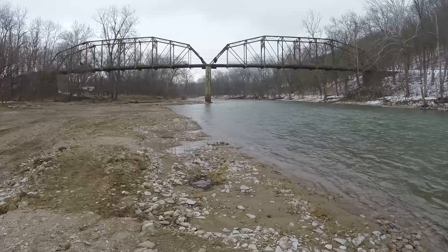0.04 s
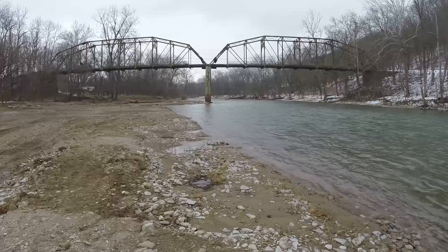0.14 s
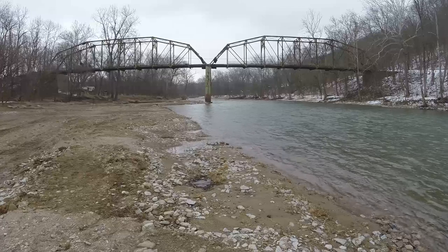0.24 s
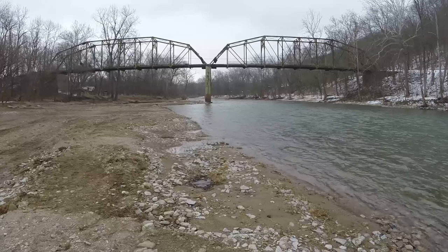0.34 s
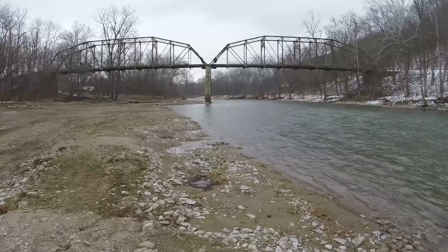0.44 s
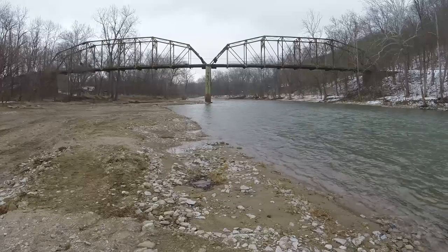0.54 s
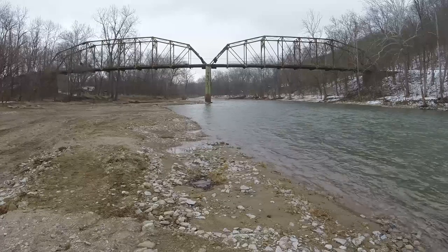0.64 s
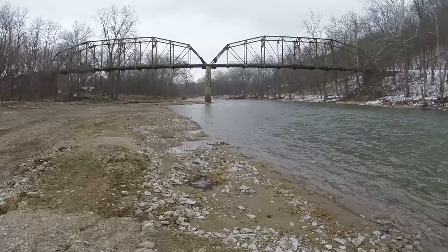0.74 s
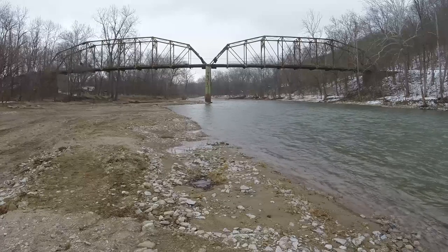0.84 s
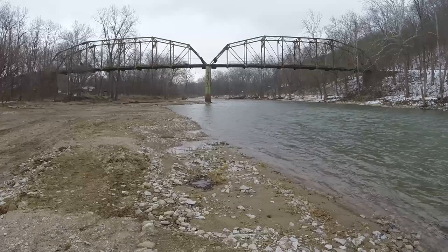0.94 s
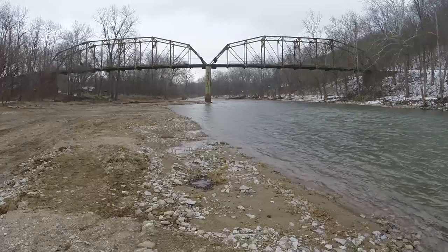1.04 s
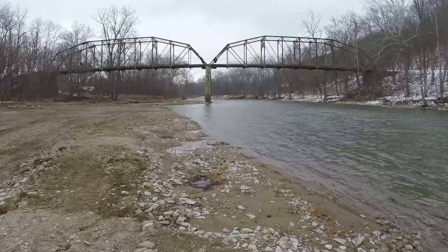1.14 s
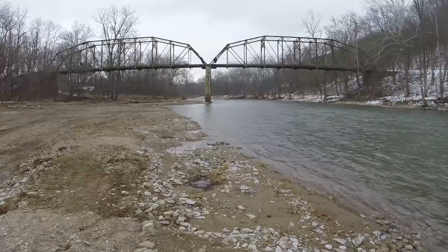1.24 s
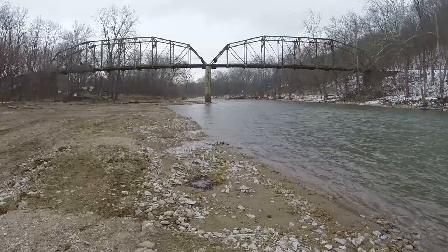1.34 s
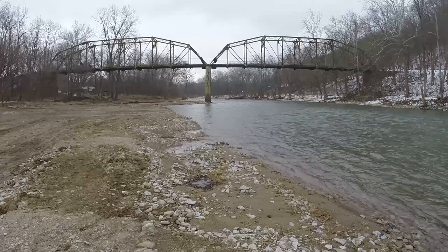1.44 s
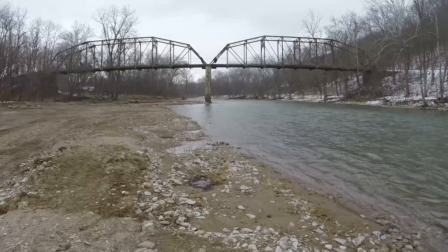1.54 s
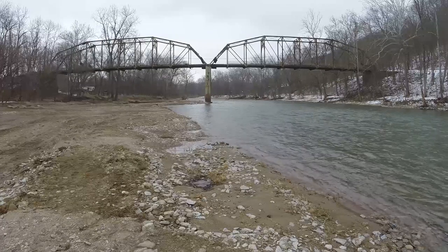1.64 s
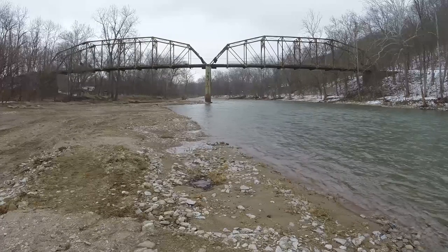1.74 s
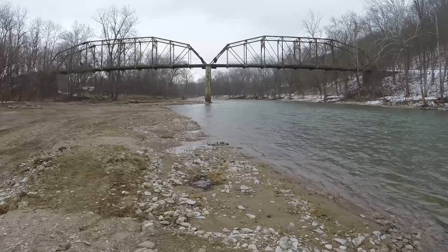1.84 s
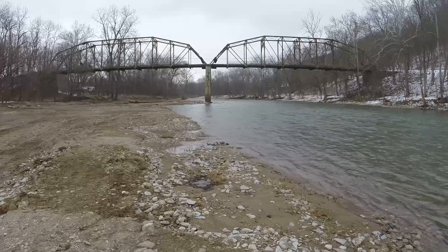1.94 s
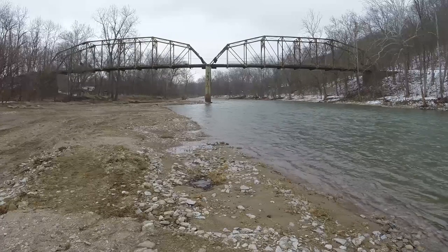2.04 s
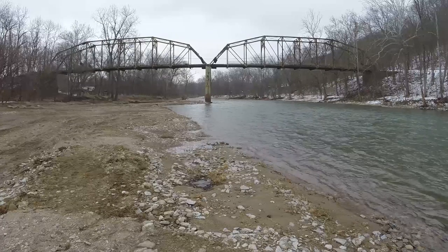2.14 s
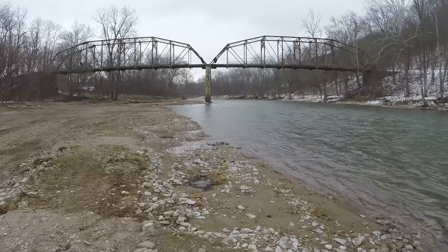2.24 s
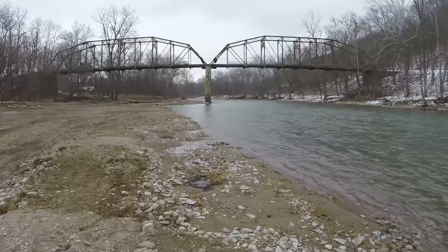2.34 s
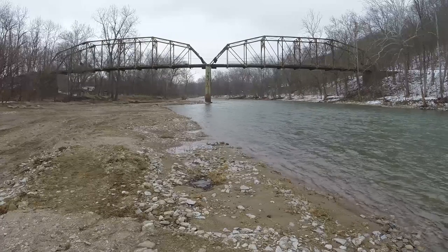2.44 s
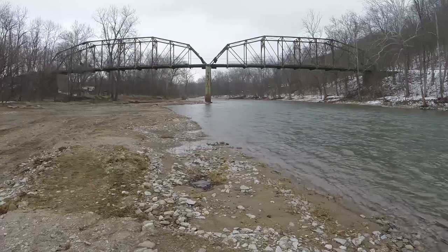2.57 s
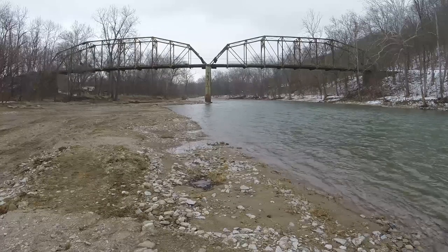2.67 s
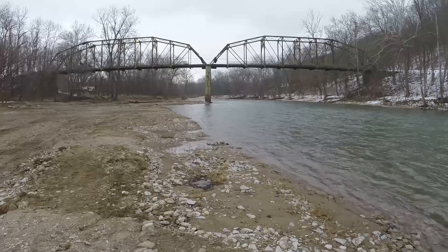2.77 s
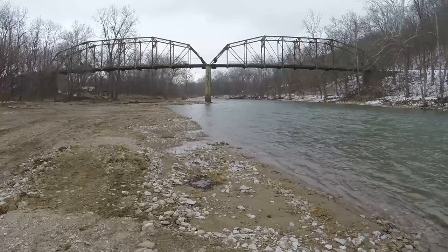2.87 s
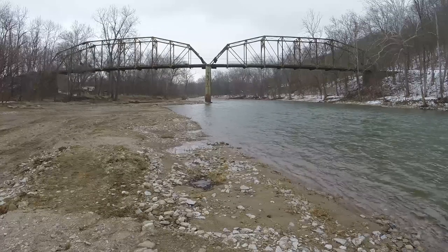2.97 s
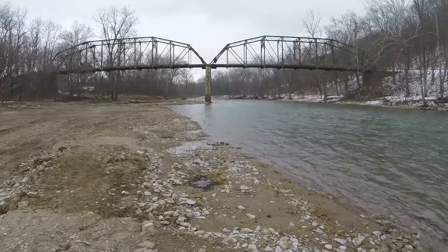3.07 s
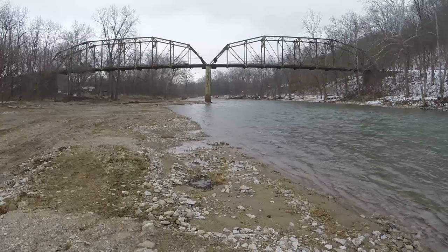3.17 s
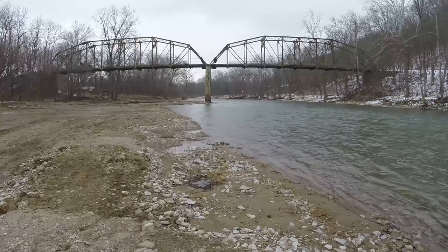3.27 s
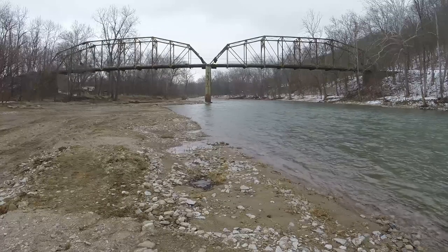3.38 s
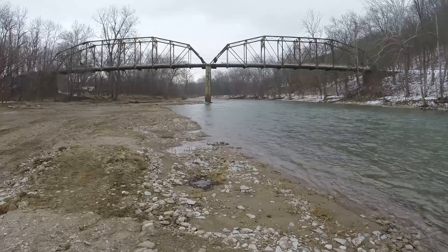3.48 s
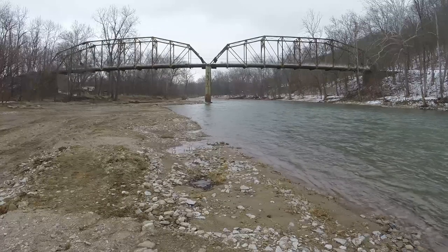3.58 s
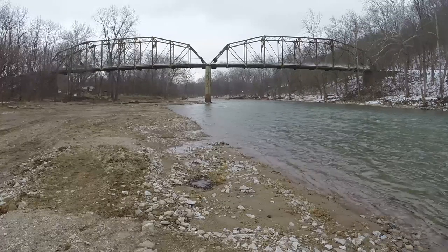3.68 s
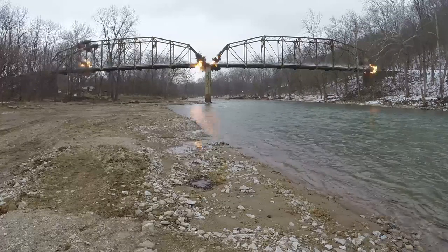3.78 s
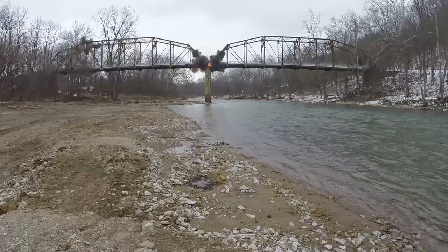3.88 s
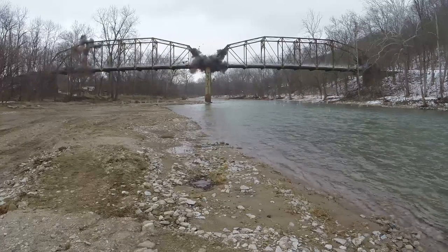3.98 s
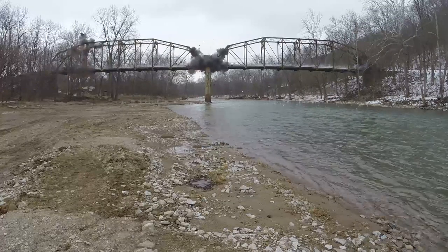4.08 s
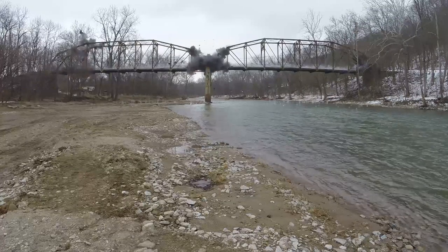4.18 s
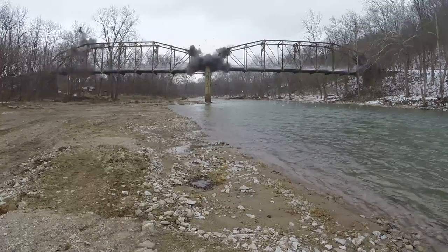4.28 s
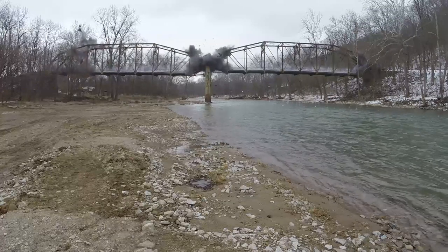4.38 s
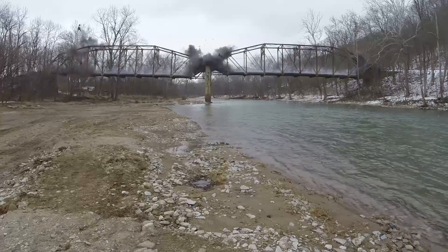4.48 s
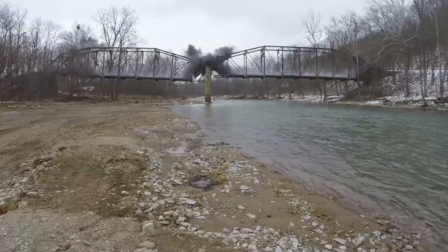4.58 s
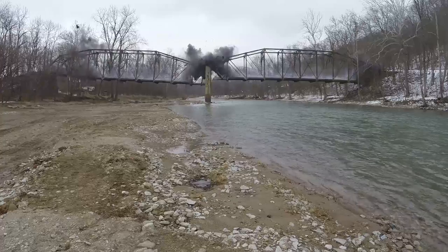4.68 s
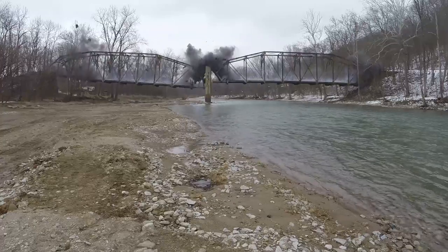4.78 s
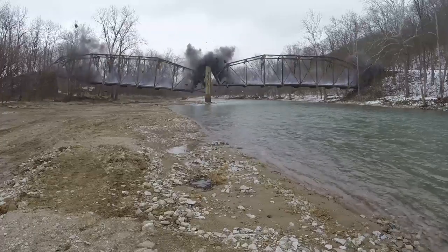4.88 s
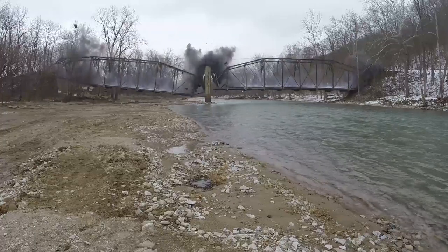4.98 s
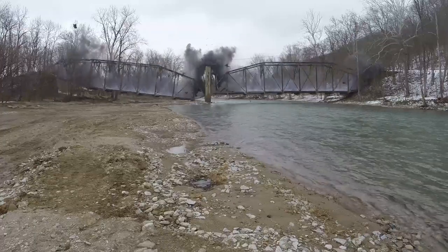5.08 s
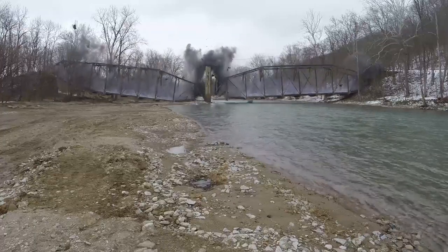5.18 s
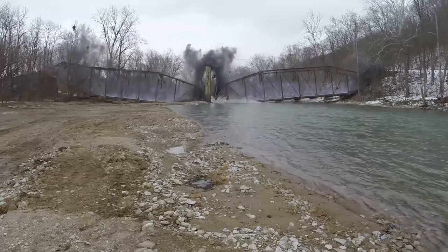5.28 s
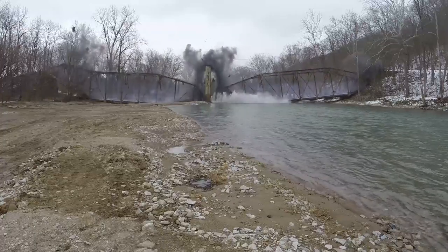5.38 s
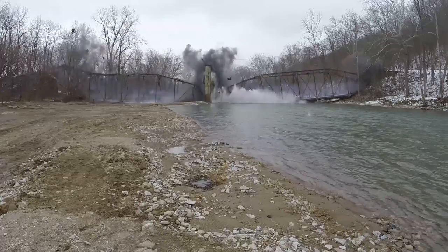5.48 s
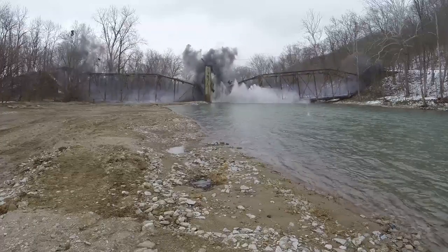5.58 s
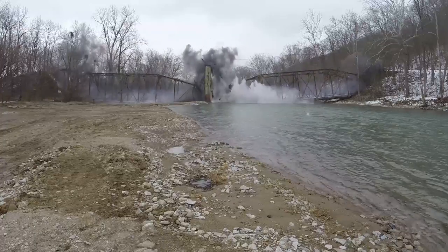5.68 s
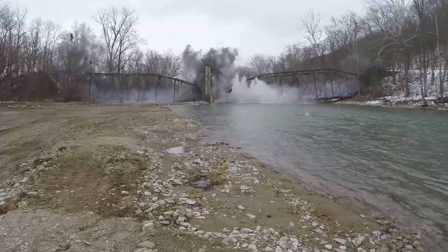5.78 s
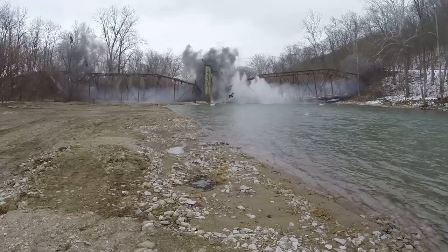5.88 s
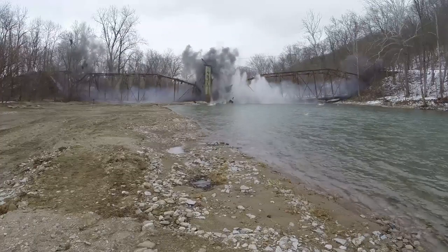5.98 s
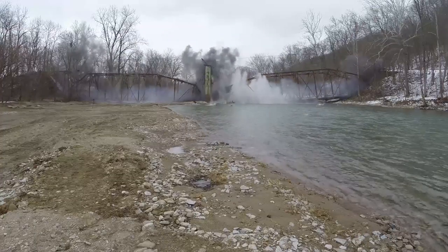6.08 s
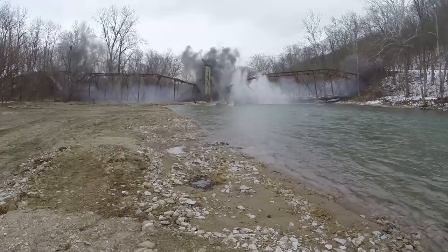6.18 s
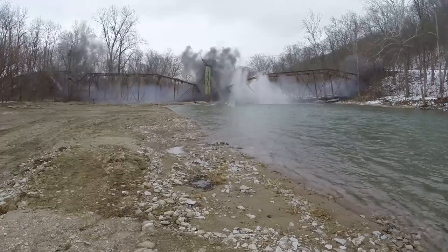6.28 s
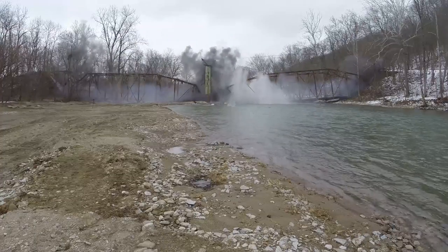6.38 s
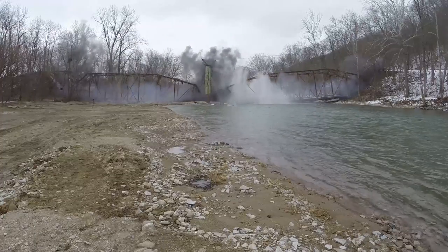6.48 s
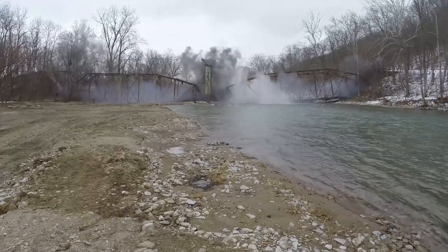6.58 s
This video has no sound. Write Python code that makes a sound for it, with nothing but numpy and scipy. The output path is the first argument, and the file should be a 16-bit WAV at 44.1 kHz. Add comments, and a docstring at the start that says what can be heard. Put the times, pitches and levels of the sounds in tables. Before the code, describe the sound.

Quiet river lapping at pebbles, then two overloaded demolition cracks split the air, followed by a long rolling valley roar with heavy steel thuds.

```python
"""Gravel bank of a river in a wooded valley: two volleys of cutting charges drop a steel truss bridge.
Blast waves overload the microphone; scattered echoes, shaped by level curves, roll back as a long roar.
The spans land as noise crashes, decaying low sines, a groan of wavering truss modes and filtered spray.
Water of coloured random clicks, drips of rising sines, an idling engine of low harmonics and a breeze
of low noise lie around it. The recorder clips and loses treble."""
import sys
import numpy as np
from scipy import signal
from scipy.fft import rfft, irfft
from scipy.io import wavfile
from scipy.ndimage import uniform_filter1d

SR = 44100
rng = np.random.default_rng(int(sys.argv[2]) if len(sys.argv) > 2 else 0)


def pcm_store(signal):
    """Save signal as 16-bit PCM."""
    levels = np.round(np.clip(np.atleast_2d(signal), -1, 1) * 32767)
    wavfile.write(sys.argv[1], SR, levels.astype(np.int16).T)


N = 291942
TIME = np.arange(N) / SR
BINS_HZ = np.fft.rfftfreq(N, 1 / SR)

# All colours: f/Hz, relative density/dB per Hz.
# Shock fronts, hard reflections and, last two, low thumps of the overloaded microphone:
# t/s, peak before the low-pass/dB, positive phase/s
PRESSURE_PULSES = [(3.7190, 22.5, 0.00055), (3.7209, 32, 0.00038), (3.7230, 9.5, 0.00044),
                   (3.7245, 7.5, 0.00076), (3.7258, 7, 0.00079), (3.762, -16, 0.00075),
                   (3.8053, -3.5, 0.0018), (4.0942, 10, 0.00025), (4.0967, 12, 0.0002),
                   (4.0985, 10, 0.00018), (4.1028, 11.5, 0.00031), (4.175, -0.5, 0.002),
                   (4.192, -8, 0.0036)]
FIRST_S, SECOND_S = 3.721, 4.094  # volleys

# Colour of the valley's echoes: f/Hz, density/dB per Hz
ROAR_COLOUR = [(20, -12.5), (60, 0.5), (90, 1.5), (150, -4.5), (320, -7.5), (700, -11.5), (1300, -12.5),
               (1800, -19), (2800, -23.5), (3700, -29.5), (5100, -28.5), (6800, -38), (11000, -53),
               (15000, -78)]
# Echoes of the first volley, sinking and then swelling: t/s, relative level/dB
FIRST_ROAR = [(3.74, -17.5), (3.784, -20.5), (3.87, -21), (4.085, -14.5)]
# Long roar after the second volley: t/s, relative level/dB
SECOND_ROAR = [(4.22, -21.0), (4.38, -18.5), (4.48, -17), (4.82, -14), (4.96, -16.5), (5.25, -15),
               (5.55, -17), (5.75, -20.5), (5.94, -18.5), (6.22, -21.5), (6.6, -23.5)]
# Air's treble loss: rate at 10 kHz, exponent over frequency, longest path
AIR_DB_PER_S, AIR_POWER, LONGEST_S = 42.5, 1.29, 0.9
# Deep booms off the hillsides: t/s, relative level/dB
BOOMS = [(3.98, -25.5), (4.17, -18), (4.34, -19.5), (4.55, -16.5), (4.888, -22), (5.061, -19), (5.2, -22),
         (5.38, -19.5)]
BOOM_RISE_S, BOOM_T60_S = 0.065, 0.3
# Rumble under the roar (level relative)
BASS_DB, BASS_BUILD_S, BASS_HOLD_UNTIL_S, BASS_FADE_DB_PER_S = -20, 0.76, 5.16, 5.5
# First answer of bank and river surface: f/Hz, density/dB per Hz
NEAR_COLOUR = [(40, -5), (90, 7), (130, -1), (190, 4), (260, -16), (600, -7), (1400, -16),
               (3500, -50), (6000, -35), (14000, -52)]

# Rasps of the overloaded microphone: t/s, relative level/dB, length/s
RASPS = [(4.094, -6.5, 0.0083), (4.109, -14.5, 0.038), (4.151, -19, 0.013), (4.163, -17.5, 0.038)]
RASP_EDGE_S, ROAR_DROP_SHARE = 0.0021, 0.42  # share: amplitude taken off the roar

# Steel landing: t/s, crash level/dB, crash f/Hz, crash length/s, thud level before decay/dB, thud f/Hz
LANDINGS = [(5.571, -18, 820, 0.042, -25, 89), (5.596, -15, 785, 0.023, -15, 90),
            (5.628, -41, 198, 0.051, -7, 30), (5.665, -25.5, 177, 0.12, -9, 55.3),
            (5.792, -40, 320, 0.052, -4, 31.2), (5.853, -19.5, 455, 0.0282, -23, 90),
            (5.923, -25.5, 1390, 0.045, -14, 69.5)]
# Truss modes: f/Hz, relative level/dB
TRUSS = [(189, 4.5), (305, -2), (510, -8.5)]
# Truss shaken by charges, landing and settling: t/s, peak level/dB, rise/s
GROANS = [(3.735, -20.5, .008), (4.19, -23.5, 0.069), (5.73, -25, 0.4), (6.6, -20.5, 0.14)]
GROAN_T60_S = 0.74
# Colour of the spray: f/Hz, density/dB per Hz
SPRAY_COLOUR = [(1500, -22), (3000, -11), (4400, -0.5), (5300, 0.5), (6200, -7.5), (8500, -20.5),
                (11000, -39), (12500, -54), (16000, -90)]
# Splashes of the spans: t/s, peak level/dB, rise/s, t60/s
SPLASHES = [(5.35, -43.5, 0.069, 2), (5.6, -50, .1, 1.6), (5.81, -48, 0.025, .25), (5.94, -44.5, .03, 0.39),
            (6.5, -55, .15, 1.7)]

# Wavelets over the stones: t/s, relative level/dB, length/s
LAPS = [(0.09, -44, 0.16), (0.239, -44, 0.11), (0.52, -59, 0.064), (1.78, -54, 0.14), (2.142, -49.5, 0.053),
        (2.667, -55.5, 0.15), (3.15, -52, 0.12), (3.313, -53, 0.21)]
# Drips and bubbles at the water's edge, last two from falling grit: t/s, relative peak/dB, initial f/Hz
DRIPS = [(0.1323, -28, 3560), (0.138, -27, 4300), (0.265, -25.5, 2410), (0.263, -24, 940),
         (0.283, -27, 1190), (0.2893, -22, 4970), (0.4325, -39, 5300), (0.5781, -37.5, 4970),
         (1.752, -32, 4550), (1.752, -36, 8700), (2.161, -40, 4800), (2.433, -27.5, 970),
         (2.618, -34, 6540), (2.700, -32, 860), (3.272, -34.5, 2960), (3.3636, -30.5, 2330),
         (3.403, -29, 1010), (3.4503, -38, 4500), (5.807, -30, 5550), (6.51, -29, 5100)]
DRIP_T60_1KHZ_S, DRIP_RING_POWER = 0.037, 0.51  # higher pitches die sooner
# Gurgle of the wavelets: f/Hz, density/dB per Hz
GURGLE_COLOUR = [(200, -22), (600, -8), (1100, -6), (1900, -21), (5000, -21), (14000, -50)]
# Pebble rustle: f/Hz, density/dB per Hz
RUSTLE_COLOUR = [(600, -20), (2500, 1), (5000, 7.5), (9000, 8), (12500, 4), (15000, -26)]

# Colour of the river's wash: f/Hz, density/dB per Hz
RIVER_COLOUR = [(25, 0.5), (45, -6.5), (85, 10.5), (130, 3.5), (220, -3), (500, 1), (1150, 0), (1750, -8.5),
                (2800, -8.5), (3700, -19.5), (5000, -15), (6000, -26.5), (11500, -30), (15000, -43)]
RIVER_DB, TICKS_DB = -46.5, -68.5
# Near bubbles ticking: f/Hz, density/dB per Hz
TICK_COLOUR = [(1000, -15.5), (4500, 2.5), (8000, 2.5), (12000, -15), (15000, -19)]
# Idling engine: multiple of firing rate, relative level/dB
ENGINE = [(1, -43.5), (2, -50), (3, -73.5)]
ENGINE_HZ, ENGINE_TRIM_DB = 48.2, -3
# Gusts on the microphone: t/s, peak level/dB
GUSTS = [(1.2, -49), (1.45, -40), (1.72, -44)]
BREEZE_DB, GUST_RISE_S, GUST_T60_S = -48.5, 0.05, 0.56
# Wind rumble: f/Hz, density/dB per Hz
BREEZE_COLOUR = [(20, -6.5), (45, 5.5), (90, -7.5), (170, -19.5), (400, -52), (2000, -100)]


def pressure_pulses():
    """Shock fronts, hard reflections and two low microphone thumps, all rounded off by a low-pass."""
    out = np.zeros(N)
    for s, db, length_s in PRESSURE_PULSES:
        add(out, s, -gain_of(db) * blast_wave(length_s))
    return passed(out, 2500, "low", order=3)


def blast_wave(length_s):
    """Sudden overpressure falling through zero into a longer suction."""
    u = np.arange(SR // 4) / SR / length_s
    return (1 - u) * np.exp(-u)


def overload(roar):
    """Second volley pins the diaphragm: the roar drops while separate rasping bursts sound over it."""
    level = sum(gain_of(db) * gate(s, length_s) for s, db, length_s in RASPS)
    end_s = RASPS[-1][0] + RASPS[-1][2]
    lowered = gate(SECOND_S, end_s - SECOND_S)
    volley = evened(passed(grains(6000, 5.7), [850, 1500], "band"))
    swing_hz = 62 * (1 + 0.35 * drift(62.5))
    swing = np.sin(2 * np.pi * np.cumsum(swing_hz) / SR) * (TIME > RASPS[1][0])
    pinned = np.clip(1.3 * volley + 2 * swing, -1, 1)
    # while pinned, output leaks back to zero; each release snaps
    leaked = passed(passed(pinned, 120, "high", order=1), 10000, "low", order=1)
    snaps = evened(passed(pinned, [3000, 12000], "band"))
    rasp = evened(leaked) + gain_of(-12.5) * snaps
    return roar * (1 - ROAR_DROP_SHARE * lowered) + level * rasp


def valley():
    """Trees and slopes scatter the shocks into dense echoes; longer paths lose treble to the air."""
    echoes = dulled(coloured(grains(9000, 2.06), ROAR_COLOUR))
    bass = irfft(rfft(echoes) / (1 + (BINS_HZ / 160) ** 8), N)
    since_s = np.maximum(TIME - FIRST_S, 0)
    fade_db = BASS_FADE_DB_PER_S * np.maximum(TIME - BASS_HOLD_UNTIL_S, 0)
    build = 1 - np.exp(-since_s / BASS_BUILD_S)
    rumble = gain_of(BASS_DB - fade_db + 1.5 * drift(9)) * build
    booms = sum(swell(s, db, BOOM_RISE_S, BOOM_T60_S) for s, db in BOOMS)
    roar = follow(FIRST_ROAR + SECOND_ROAR) * gain_of(0.5) * steadied(echoes - bass)
    roar += np.hypot(rumble, booms) * steadied(bass)
    # bank and river surface answer first, t60 0.5 s
    near = coloured(rng.standard_normal(N), NEAR_COLOUR) * gain_of(-10.5 - 60 * since_s / 0.5)
    return (roar + near) * np.minimum(since_s / 0.0029, 1)


def dulled(echoes):
    """Air absorption growing with path and frequency; path age restarts for the second volley."""
    hz, t, spectrum = signal.stft(echoes, SR, nperseg=512)
    age_s = np.where(t < SECOND_S, 0.7 * (t - FIRST_S), t - SECOND_S - 0.25)
    loss_db = AIR_DB_PER_S * np.clip(age_s, 0, LONGEST_S) * (hz[:, None] / 10000) ** AIR_POWER
    return signal.istft(spectrum * gain_of(-loss_db), SR, nperseg=512)[1][:N]


def collapse():
    """Spans strike bank and water: crashes, thuds, a groaning truss and spray."""
    return landings() + groan() + spray()


def landings():
    """Band-passed noise bursts for clattering steel, decaying sines for thuds."""
    out, t = np.zeros(N), np.arange(SR // 4) / SR
    for s, crash_db, hz, length_s, thud_db, thud_hz in LANDINGS:
        size = round(length_s * SR)
        noise = passed(rng.standard_normal(len(t)), [hz * 0.59, hz * 1.72], "band", order=3)
        clatter = evened(noise[-size:])
        add(out, s, gain_of(crash_db) * clatter * signal.windows.tukey(size, 0.3))
        # falling deck shoves the air out and draws it back: little more than one cycle
        thud = np.sin(2 * np.pi * thud_hz * t) * np.exp(-1.6 * thud_hz * t)
        add(out, s, gain_of(thud_db) * thud)
    return out


def groan():
    """Bending steel makes each truss mode waver in pitch and strength."""
    modes = np.zeros(N)
    for hz, db in TRUSS:
        bent_hz = hz * (1 + 0.0285 * drift(19.35))
        modes += gain_of(db + 3.4 * drift(17)) * np.sin(2 * np.pi * np.cumsum(bent_hz) / SR)
    strain = sum(swell(s, db, rise_s, GROAN_T60_S) for s, db, rise_s in GROANS)
    return strain * evened(modes)


def spray():
    """Thrown droplets: coloured random clicks under the splash envelopes."""
    drops = coloured(grains(4000, 2.9), SPRAY_COLOUR) * gain_of(1.6 * drift(25))
    return sum(swell(*row) for row in SPLASHES) * drops


def shore():
    """Wavelets gurgle and rustle over pebbles and shed bubbles whose pitch rises as they die."""
    out, t = np.zeros(N), np.arange(SR // 8) / SR
    gurgle = coloured(grains(6000, 4.1), GURGLE_COLOUR)
    rustle = coloured(pings(2200, 7), RUSTLE_COLOUR)
    lap = gurgle + gain_of(-7) * rustle
    for s, db, length_s in LAPS:
        out += gain_of(db) * np.exp(-(2 * (TIME - s) / length_s - 1) ** 2) * lap
    for s, db, hz in DRIPS:
        t60_s = DRIP_T60_1KHZ_S * (1000 / hz) ** DRIP_RING_POWER
        bubble = np.sin(2 * np.pi * hz * t * (1 + 1.9 * t))
        noise = rng.standard_normal(len(t))
        splash = evened(passed(noise, [hz * 0.68, hz * 1.54], "band", order=3))
        add(out, s, gain_of(db - 60 * t / t60_s) * (0.68 * bubble + 0.18 * splash))
    return out


def river():
    """Countless small bubbles merge into a wash; nearer ones tick."""
    wash = coloured(grains(20000, 1.9), RIVER_COLOUR) * gain_of(0.5 * drift(14))
    ticks = coloured(pings(280, 7.2), TICK_COLOUR) * gain_of(2.7 * drift(4))
    return gain_of(RIVER_DB) * wash + gain_of(TICKS_DB) * ticks


def engine():
    """Far idling engine: harmonics of the firing rate, wavering in pitch and level."""
    turns = np.cumsum(ENGINE_HZ * (1 + 0.0211 * drift(6.2))) / SR
    out = np.zeros(N)
    for k, db in ENGINE:
        out += gain_of(db + 1.1 * drift(4.2)) * np.sqrt(2) * np.sin(2 * np.pi * k * turns)
    return out * gain_of(ENGINE_TRIM_DB)


def breeze():
    """Light wind rumbles on the microphone: low noise, steady plus gusts."""
    level = gain_of(BREEZE_DB) + sum(swell(s, db, GUST_RISE_S, GUST_T60_S) for s, db in GUSTS)
    return level * coloured(rng.standard_normal(N), BREEZE_COLOUR)


def pings(per_s, spread_db, cycles=7):
    """Tiny bubbles and pebble ticks, each ringing a few cycles at one of 20 pitches; rms 1."""
    t, out = np.arange(500) / SR, np.zeros(N)
    for hz in np.geomspace(1200, 12500, num=20):
        ring = np.sin(2 * np.pi * hz * t) * hz * t * np.exp(-4 * hz * t / cycles)
        out += signal.oaconvolve(grains(per_s / 20, spread_db), ring / np.linalg.norm(ring))[:N]
    return evened(out)


def grains(per_s, spread_db):
    """Random clicks of either sign, a few much larger than the rest; rms 1."""
    size = gain_of(spread_db * np.minimum(rng.exponential(1, N), 4))
    return evened(size * rng.choice([-1, 1], N) * (rng.random(N) < per_s / SR))


def drift(hz):
    """Slow chance of rms 1."""
    return evened(irfft(rfft(rng.standard_normal(N)) * np.exp(-(BINS_HZ / hz) ** 2), N))


def coloured(x, points):
    """Shapes the spectrum of x by (f/Hz, dB) points over log f; rms 1."""
    hz, db = np.transpose(points)
    curve_db = np.interp(np.log(BINS_HZ + 1), np.log(hz), db)
    return evened(irfft(rfft(x) * gain_of(curve_db), N))


def passed(x, hz, kind, order=2):
    """Causal low-, high- or band-pass."""
    return signal.sosfilt(signal.butter(order, hz, kind, fs=SR, output="sos"), x)


def swell(s, db, rise_s, t60_s):
    """Envelope rising smoothly to its peak at s, then dying away."""
    since_s = TIME - s
    rise = np.exp(-(np.minimum(since_s, 0) / rise_s) ** 2)
    return gain_of(db - 60 * np.maximum(since_s, 0) / t60_s) * rise


def gate(s, length_s):
    """1 from s for length_s, with quick edges inside."""
    return np.clip(np.minimum(TIME - s, s + length_s - TIME) / RASP_EDGE_S, 0, 1)


def follow(rows):
    """Gain over time from (t/s, level/dB) rows."""
    s, db = np.transpose(rows)
    return gain_of(np.interp(TIME, s, db))


def steadied(x, size=3000):
    """Holds the running rms over size samples at 1."""
    return x / np.sqrt(uniform_filter1d(x ** 2, size=size) + 1e-12)


def evened(x):
    """Scales to rms 1."""
    return x / np.sqrt(np.mean(x ** 2) + 1e-20)


def gain_of(db):
    """Decibels to amplitude."""
    return 10 ** (np.asarray(db) / 20)


def add(mix, s, sound):
    """Mixes a sound in at s."""
    part = mix[round(s * SR):][:len(sound)]
    part += sound[:len(part)]


def scene():
    """Demolition over the river bank's water, engine and breeze; one channel."""
    blasts = pressure_pulses() + overload(gain_of(-0.5) * valley())
    return (blasts + collapse() + shore() + river() + engine() + breeze())[None]


def record(dry):
    """Recorder: low cut, clipping at full scale, softened treble, band limit."""
    clipped = np.clip(passed(dry, 9.8, "high", order=1), -1, 1)
    softened = passed(clipped, 6800, "low", order=1)
    band_limit = signal.firwin(127, 15400, window=("kaiser", 9), fs=SR)
    return signal.oaconvolve(softened, band_limit[None], "same")


dry = scene()
out = record(dry)
pcm_store(out)
```